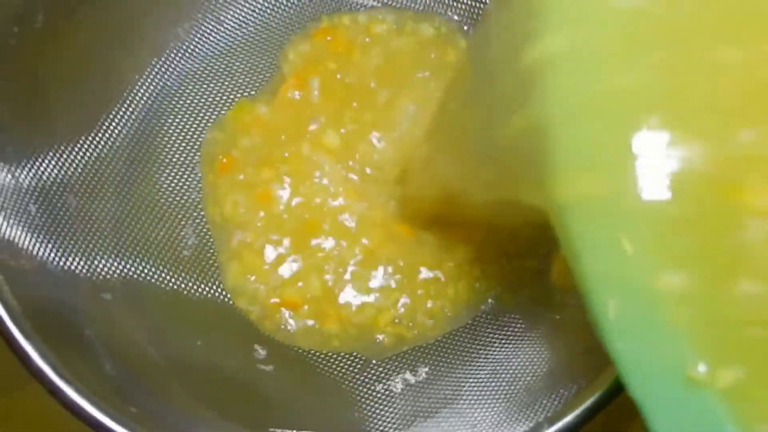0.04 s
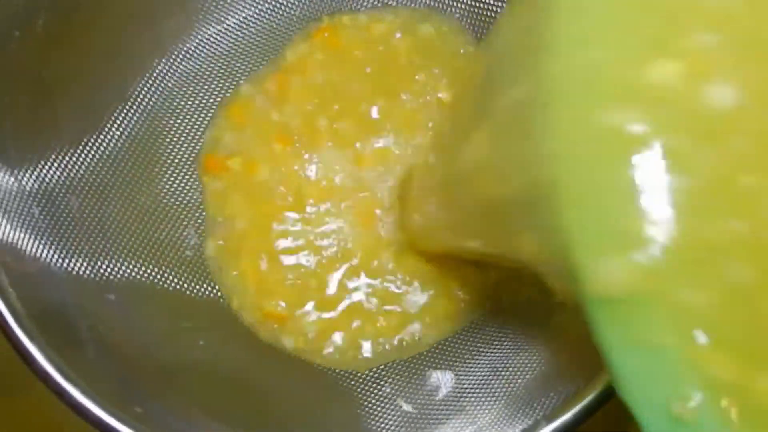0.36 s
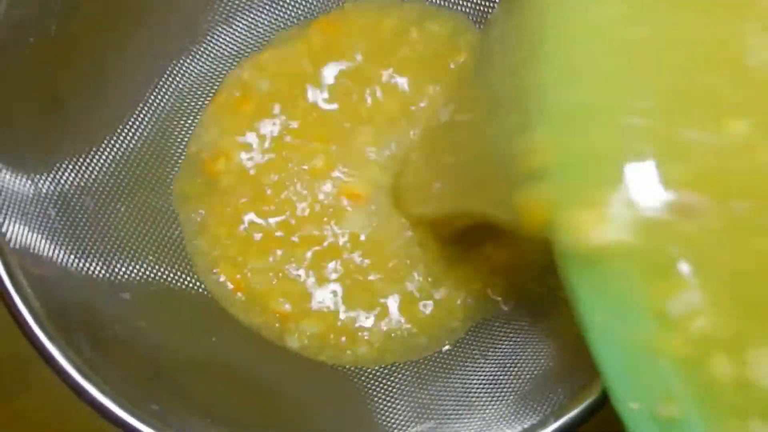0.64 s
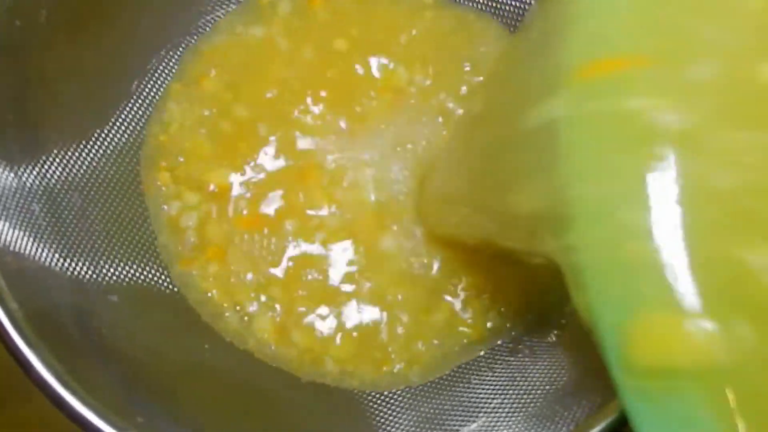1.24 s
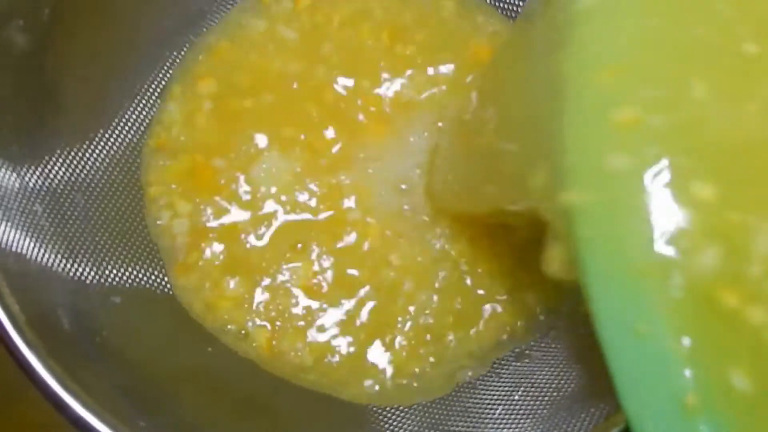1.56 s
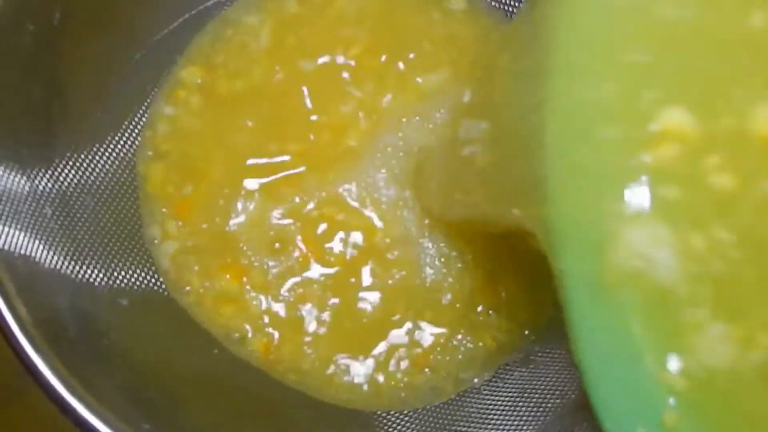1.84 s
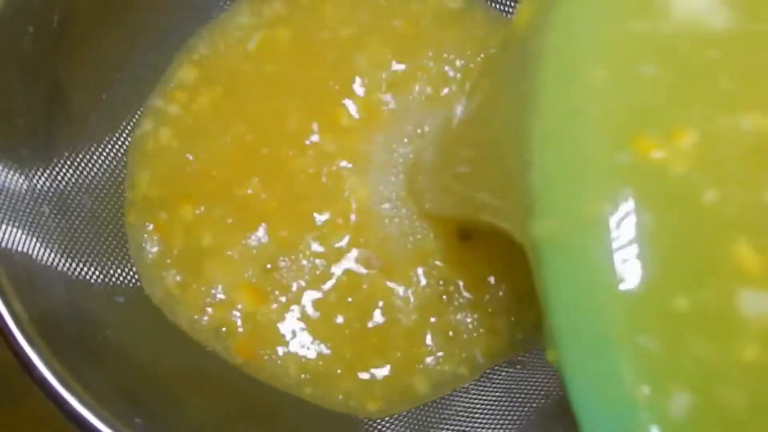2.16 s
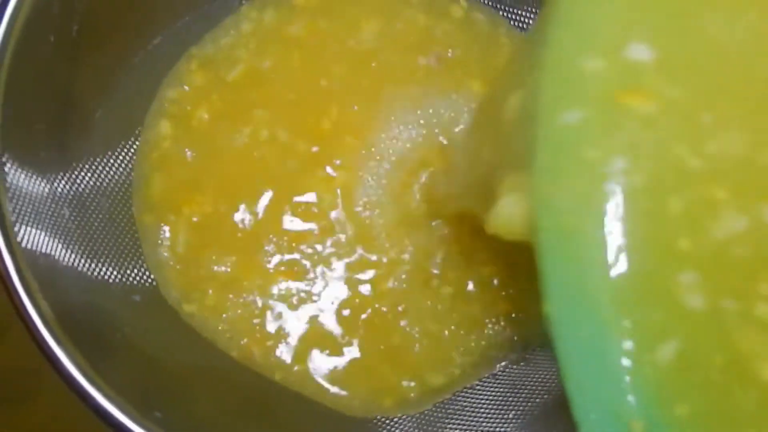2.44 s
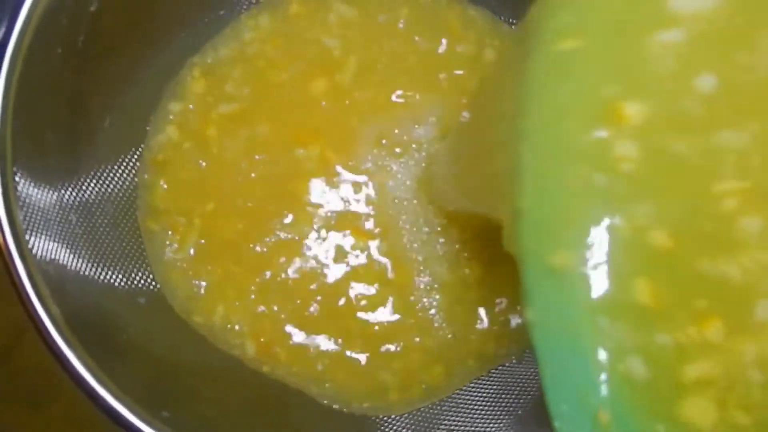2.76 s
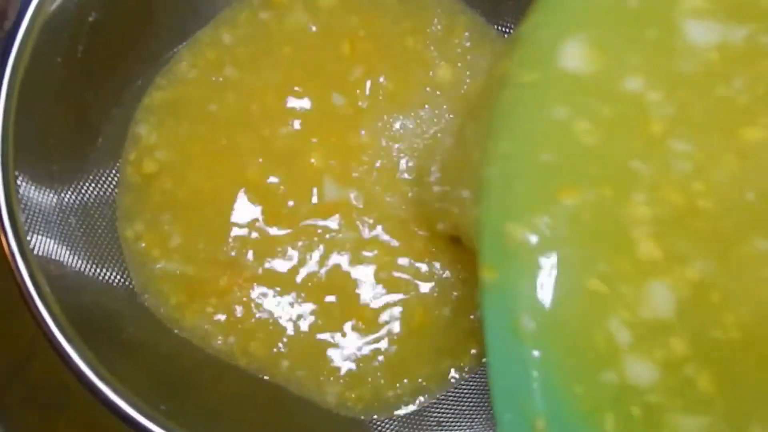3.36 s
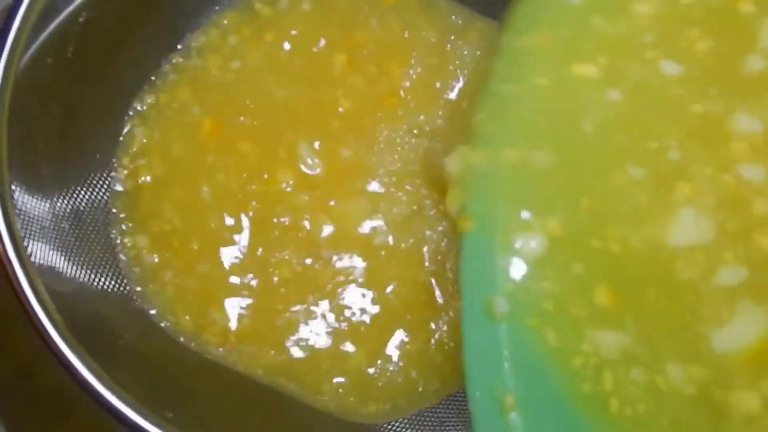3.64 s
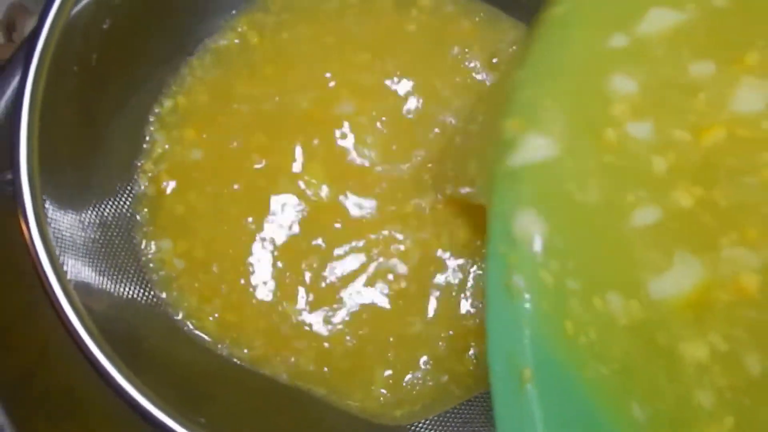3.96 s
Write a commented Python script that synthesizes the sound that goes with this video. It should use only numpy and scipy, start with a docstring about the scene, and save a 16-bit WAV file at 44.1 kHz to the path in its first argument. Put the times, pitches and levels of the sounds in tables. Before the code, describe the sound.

Thick juice splatters and gurgles through a strainer into a metal bowl, slowly thinning.

```python
"""Pulpy juice pours through a mesh strainer into a steel bowl, close to a stereo microphone in a kitchen.
Falling strings of juice trap bubbles: big ones plop, small ones squelch and fizz. Lumps of pulp smack
down, films snap on the mesh, and the air in the bowl rings along. The pour thins until single drips
stand out, and the vessels bump softly twice near the end. Behind it all is the quiet air of the room."""
import sys
import numpy as np
from scipy import signal
from scipy.fft import rfft, irfft
from scipy.io import wavfile
from scipy.ndimage import uniform_filter1d

SR = 44100
rng = np.random.default_rng(int(sys.argv[2]) if len(sys.argv) > 2 else 0)


def wav_out(sig):
    """Save sig, one row per channel (or a flat mono array), as 16-bit PCM at SR to the path in sys.argv[1]."""
    wavfile.write(sys.argv[1], SR, np.round(np.clip(np.atleast_2d(sig).T, -1, 1) * 32767).astype(np.int16))


N = 176400  # 4 s


def undb(db):
    """Decibels to amplitude."""
    return 10 ** (np.asarray(db) / 20)


def unit(x):
    """Scale to an RMS of 1."""
    return x / np.sqrt(np.mean(x ** 2))


def add(out, start_s, x):
    """Mix x into out from a given time."""
    i = max(int(start_s * SR), 0)
    out[i:i + len(x)] += x[:max(len(out) - i, 0)]


def colour(x, points):
    """Filter by (freq_hz, gain_db) points."""
    hz, db = np.array(points, float).T
    bins_hz = np.maximum(np.fft.rfftfreq(x.shape[-1], 1 / SR), 1)
    return irfft(rfft(x) * undb(np.interp(np.log(bins_hz), np.log(hz), db)), x.shape[-1])


def fade(t, t60_s):
    """A decay that falls 60 dB in t60_s."""
    return np.exp(-np.log(1000) * t / t60_s)


def wander(per_s):
    """Slow random motion with a spread of 1."""
    hold = int(SR / per_s)
    return unit(uniform_filter1d(rng.standard_normal(N)[np.arange(N) // hold], hold))


def echoes(x, t60_s):
    """Dense dying reflections of x, the first after 1 ms."""
    t = np.arange(int(t60_s * SR)) / SR
    response = rng.standard_normal(SR * 2)[:len(t)] * fade(t, t60_s) * (t > 0.001)
    return signal.fftconvolve(x, response / np.sqrt(np.sum(response ** 2)))[:N]


# Room tone of the kitchen, all around the microphone: freq_hz, gain_db
ROOM_TONE_COLOUR = [(28, -78), (77, -2), (110, -19), (200, -1.5), (270, -7), (1500, -14.5), (15000, -30.5)]
def room_tone(level_db=-51.5):
    """Steady, dull noise of the room, as mid and a weaker side."""
    mid, side = undb(level_db) * unit(colour(rng.standard_normal((2, N)), ROOM_TONE_COLOUR))
    return mid, 0.5 * side


def kitchen_echo(x, gain_db=-12, damping_hz=4020):
    """The kitchen walls return a short echo and soak up its treble."""
    damping = signal.butter(1, damping_hz, fs=SR, output="sos")
    return undb(gain_db) * signal.sosfilt(damping, echoes(x, t60_s=0.39))


# Stereo width at the microphone, side against mid: freq_hz, gain_db
SIDE_COLOUR = [(650, -21), (1100, -60.5), (2900, -36), (4500, -9.5)]
def stereo_side(mid, left_bias=0.17):
    """Each droplet lands at its own place between left and right, heard mostly in the treble."""
    place = unit(uniform_filter1d(uniform_filter1d(rng.standard_normal(N), size=40), size=40))
    return colour(mid, SIDE_COLOUR) * (left_bias + place)


# The vessels touching, near the microphone: start_s, level_db
VESSEL_BUMPS = [(3.504, -36), (3.766, -34)]
# Their low ring: pitch_hz, level_db, t60_s
VESSEL_MODES = [(88, 1, 0.15), (117, 1.5, 0.11)]
def bumps(scuff_db=2, scuff_hz=810, swell_s=0.0058):
    """The vessels knock together: a dull scuff of contact and a low ring."""
    out, t = np.zeros(N), np.arange(SR // 3) / SR
    band = signal.butter(2, [scuff_hz / 3, scuff_hz], "bandpass", fs=SR, output="sos")
    for start_s, level_db in VESSEL_BUMPS:
        ring = sum(undb(db) * fade(t, t60_s) * np.sin(2 * np.pi * (hz * t + rng.random()))
                   for hz, db, t60_s in VESSEL_MODES)
        ring *= 1 - np.exp(-t / swell_s)
        scuff = unit(signal.sosfilt(band, rng.standard_normal(len(t)))) * fade(t, t60_s=0.11)
        add(out, start_s, undb(level_db) * (ring + undb(scuff_db) * scuff))
    return out


# Air inside the steel bowl, close up: pitch_hz, level_db, t60_s
BOWL_AIR_MODES = [(773.5, 4.5, 0.084), (945, 3, 0.02), (1440, 6.5, 0.084), (2086, 4, 0.045)]
def bowl(x, ring_db=-2, wall_db=-8.5, detune=0.032, slosh_per_s=14):
    """Adds the ring of the bowl's air, detuned by sloshing juice, and echoes off its steel wall."""
    ring = 0
    for hz, db, t60_s in BOWL_AIR_MODES:
        pitch_hz = hz * (1 + detune * wander(slosh_per_s))
        carrier = np.exp(2j * np.pi * np.cumsum(pitch_hz) / SR)
        pole = fade(1 / SR, t60_s)
        ring += 2 * undb(db) * np.real(carrier * signal.lfilter([1 - pole], [1, -pole], x / carrier))
    # The wall echoes change with the place where the juice lands.
    places = np.array([wander(slosh_per_s) for _ in range(5)])
    walls = sum(echoes(x * share, t60_s=0.047) for share in places / np.linalg.norm(places, axis=0))
    return x + undb(ring_db) * ring + undb(wall_db) * walls


# Films of juice bursting on the strainer: start_s, level_db
FILM_SNAPS = [(0.655, -35), (1.2334, -30), (1.4693, -33), (1.5183, -23), (1.5781, -26.5), (2.135, -26),
              (2.5061, -21), (2.6694, -27.5), (2.857, -20.5), (3.1378, -25), (3.2202, -28), (3.313, -26.5),
              (3.9588, -25)]
# Their bright tick: freq_hz, gain_db
FILM_COLOUR = [(200, -4.5), (8000, -0.5), (16000, -9)]
def snaps(gain_db=8.5, crackle_db=-17, stretch_s=0.0026, tick_s=0.0013, spray_s=0.0015):
    """A film crackles as it stretches, then bursts with a sharp tick and a brief spray."""
    out, t = np.zeros(N), np.arange(-(SR // 100), SR // 20) / SR
    tick = (t >= 0) * np.exp(-abs(t) / tick_s)
    crackle = undb(crackle_db) * np.exp(-abs(t) / np.where(t < 0, stretch_s, spray_s))
    for start_s, level_db in FILM_SNAPS:
        burst = (tick + crackle) * rng.standard_normal(len(t))
        add(out, start_s + t[0], undb(level_db + gain_db) * burst)
    return colour(out, FILM_COLOUR)


# Lumps of pulp landing in the bowl: start_s, level_db
PULP_SMACKS = [(0.43, -24.5), (0.656, -19), (0.792, -20.5), (1.229, -36), (1.445, -22), (2.156, -24),
               (2.368, -20), (2.48, -19.5), (2.827, -25), (3.114, -25), (3.263, -17), (3.384, -24),
               (3.489, -23), (3.658, -22.5), (3.691, -28), (3.759, -25.5)]
# Wet pulp at close range, lumps and fine splatter alike: freq_hz, gain_db
PULP_COLOUR = [(300, -29), (600, -3.5), (950, 8.5), (2800, 8.5), (6000, -6.5), (15000, -21.5)]
def smacks(gain_db=-3.5, rise_s=0.0016, decay_s=0.0052):
    """Soft lumps of pulp flatten with a short wet burst."""
    envelope, t = np.zeros(N), np.arange(SR // 10) / SR
    shape = (1 - np.exp(-t / rise_s)) * np.exp(-t / decay_s)
    for start_s, level_db in PULP_SMACKS:
        add(envelope, start_s, undb(level_db + gain_db) * shape / shape.max())
    return envelope * unit(colour(rng.standard_normal(N), PULP_COLOUR))


def bubble(hz, cycles, rise=0.037):
    """A bubble in thick juice swells quickly, rises in pitch and dies away over about `cycles` turns."""
    turns = np.arange(int(3 * cycles * SR / hz)) * hz / SR
    age = turns / cycles
    shape = (1 - np.exp(-turns)) * np.exp(-age ** 2)
    glide = 1 + rise * (age - 0.5) / 2
    return shape / shape.max() * np.sin(2 * np.pi * turns * glide)


SPLASH_LEAD_S = 0.0044  # a drop splashes before its bubble sounds
def splash(hz, count=6, within_s=0.0116):
    """A cluster of small bubbles thrown up as a drop lands."""
    out = np.zeros(SR // 10)
    for wait_s, octaves in zip(rng.uniform(0, within_s, count), rng.uniform(-0.83, 1, count)):
        add(out, wait_s, bubble(hz * 2 ** octaves, cycles=1.64))
    return out


# Small bubbles in the pulp, close up: start_s, level_db, pitch_hz
PULP_SQUELCHES = [(0.724, -23, 3110), (1.0854, -24, 3270), (2.0946, -21, 4000), (2.2648, -21.5, 2620),
                  (3.3114, -19.5, 4970)]
def squelches(bubble_db=4.5, splash_db=-2.5):
    """Pulp squelches: one small bubble rings amid a cluster of briefer ones."""
    out = np.zeros(N)
    for start_s, level_db, pitch_hz in PULP_SQUELCHES:
        add(out, start_s, undb(level_db + bubble_db) * bubble(pitch_hz, cycles=8.5))
        add(out, start_s - SPLASH_LEAD_S, undb(level_db + splash_db) * splash(pitch_hz))
    return out


# Big drops falling into the bowl, close to the microphone: start_s, level_db, pitch_hz
DROP_PLOPS = [(0.168, -15.5, 1460), (0.193, -26.5, 960), (0.541, -21.5, 720), (0.572, -20, 700),
              (0.649, -28, 870), (0.813, -19.5, 930), (0.891, -15, 930), (1.022, -19, 580),
              (1.052, -23, 790), (1.145, -18, 735), (1.311, -14, 904), (1.604, -22, 690),
              (1.932, -19.5, 820), (1.965, -16.5, 1070), (1.985, -14.5, 846), (2.008, -16, 750),
              (2.085, -17, 814), (2.113, -16.5, 1400), (2.139, -12, 820), (2.301, -21, 740),
              (2.342, -14, 1290), (2.48, -21, 1360), (2.507, -28.5, 710), (2.677, -18, 904),
              (2.852, -19.5, 1080), (2.884, -20.5, 940), (3.116, -14.5, 1254), (3.176, -17, 1430),
              (3.221, -13, 1040), (3.264, -17, 970), (3.431, -20, 975), (3.563, -19, 1270),
              (3.764, -21, 893), (3.86, -15, 930), (3.959, -17, 1100)]
def plops(bubble_db=-2.5, splash_db=-16.5):
    """A big drop splashes and traps a bubble, which rings."""
    out = np.zeros(N)
    for start_s, level_db, pitch_hz in DROP_PLOPS:
        add(out, start_s - 1 / pitch_hz, undb(level_db + bubble_db) * bubble(pitch_hz, cycles=4.18))
        add(out, start_s - SPLASH_LEAD_S, undb(level_db + splash_db) * splash(hz=1990))
    return out


def arrivals(count, thinning_per_s=0.3):
    """Random moments, in seconds, that get rarer as the pour thins."""
    share_in_scene = 1 - np.exp(-thinning_per_s * N / SR)
    return -np.log(1 - rng.random(count) * share_in_scene) / thinning_per_s


def swarm(count, low_hz, high_hz, cycles, spread_db, rise):
    """The stream traps many bubbles of random size and strength."""
    out = np.zeros(N)
    draws = zip(arrivals(count), rng.random((count, 3)), rng.standard_normal(count))
    for start_s, (smallness, length, glide), strength in draws:
        pitch_hz = low_hz * (high_hz / low_hz) ** smallness
        ring = bubble(pitch_hz, cycles * (0.5 + length), rise * 2 * glide)
        add(out, start_s, undb(spread_db * min(strength, 2)) * ring)
    return out


def patter(count, spread_db, burst_s, squirt_db=3.5, squirts_per_s=35):
    """Tiny droplets land in squirts, each a very short burst of noise."""
    impacts = np.zeros(N)
    landings = (arrivals(count) * SR).astype(int)
    strengths = undb(spread_db * np.minimum(rng.standard_normal(count), 2.5))
    np.add.at(impacts, landings, strengths ** 2)
    impacts *= undb(squirt_db * wander(squirts_per_s)) ** 2
    pole = np.exp(-2 / (burst_s * SR))
    energy = signal.lfilter([1], [1, -pole], uniform_filter1d(impacts, size=64))
    return np.sqrt(abs(energy)) * rng.standard_normal(N)


# Strength of the stream through the strainer: time_s, level_db
STREAM_LEVEL = [(0, -29.5), (0.36, -32), (0.56, -30.5), (0.96, -32.5), (1.28, -32.5), (1.5, -30.5),
                (1.62, -35.5), (1.79, -36.5), (1.89, -31.5), (2.21, -36), (2.45, -34), (2.54, -40.5),
                (2.77, -38), (2.85, -34), (2.97, -34.5), (3.13, -37), (3.48, -35), (3.6, -39.5),
                (3.83, -42.5), (3.93, -36.5)]
def flow(x, offset_db):
    """Make a layer follow the slow spurts of the stream, shifted by offset_db."""
    time_s, level_db = np.array(STREAM_LEVEL).T
    slow_rms = np.sqrt(uniform_filter1d(uniform_filter1d(x ** 2, size=4000), size=4000) + 1e-12)
    return x / slow_rms * undb(offset_db + np.interp(np.arange(N) / SR, time_s, level_db))


# Fizz at the mesh, close to the microphone: freq_hz, gain_db
MESH_COLOUR = [(1000, -6), (5000, 9), (12000, 2.5), (16000, -4)]
def pour(pooled_s=0.39, clogging_db_per_s=-2):
    """The running stream: gurgle, squishing and splattering pulp, foam, and fizz at the mesh."""
    t = np.arange(N) / SR
    gurgle = swarm(count=480, low_hz=732, high_hz=1557, cycles=5.34, spread_db=4.5, rise=0.037)
    squish = swarm(count=2000, low_hz=1404, high_hz=4714, cycles=7.4, spread_db=8.5, rise=0.0055)
    foam = swarm(count=1100, low_hz=4450, high_hz=10660, cycles=22, spread_db=12, rise=0.012)
    splatter = colour(patter(count=1800, spread_db=6.5, burst_s=0.0033), PULP_COLOUR)
    fizz = colour(patter(count=3600, spread_db=12, burst_s=0.0011), MESH_COLOUR)
    pooling_db = -13.5 * np.maximum(1 - (t / pooled_s) ** 2, 0)  # the gurgle grows until juice pools
    clogging_db = clogging_db_per_s * t  # the mesh clogs and the hiss dies away
    return (flow(gurgle, pooling_db - 6.5) + flow(squish, -5) + flow(splatter, -5)
            + flow(foam, clogging_db - 11.5) + flow(fizz, clogging_db - 7))


# Falling juice at close range, weak just under the bowl's ring: freq_hz, gain_db
JUICE_COLOUR = [(250, 9.5), (540, -2), (720, -0.5)]
def juice():
    """Drops, pulp and stream fall from the strainer while films snap on its mesh."""
    return colour(plops() + squelches() + smacks() + pour(), JUICE_COLOUR) + snaps()


def scene():
    """The bowl close to the microphone, the kitchen soft behind it; mid and side give left and right."""
    close = bowl(juice())
    mid = close + kitchen_echo(close) + bumps()
    side = stereo_side(mid)
    room_mid, room_side = room_tone()
    mid, side = mid + room_mid, side + room_side
    return np.array([mid + side, mid - side])


def record(dry, top_hz=16100):
    """The recorder cuts the highest treble steeply."""
    return signal.sosfilt(signal.ellip(8, 0.2, 70, top_hz, fs=SR, output="sos"), dry)


dry = scene()
out = record(dry)
wav_out(out)
```